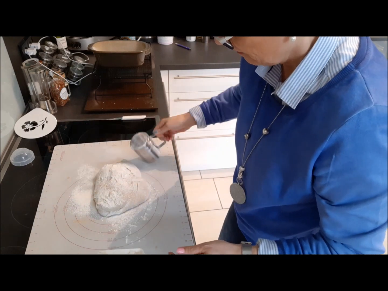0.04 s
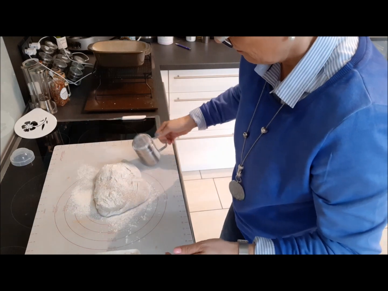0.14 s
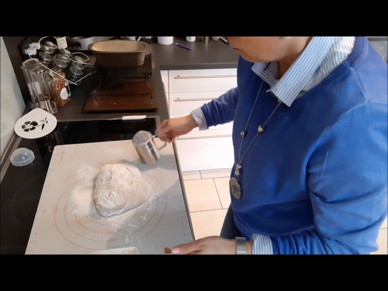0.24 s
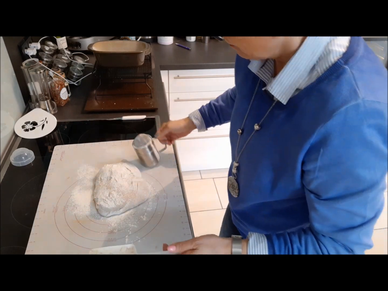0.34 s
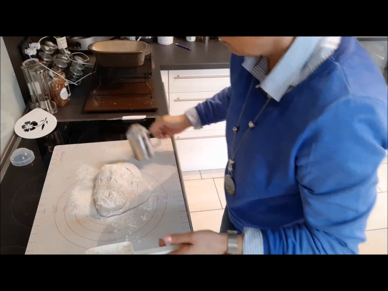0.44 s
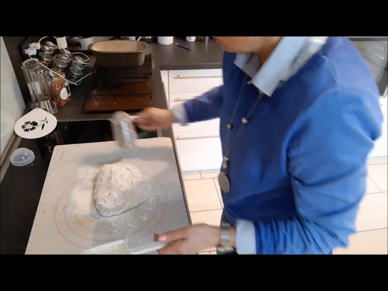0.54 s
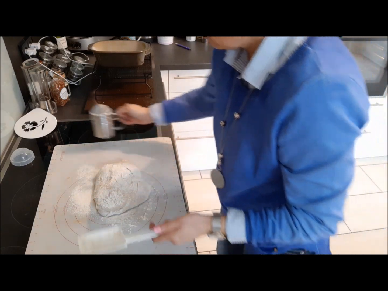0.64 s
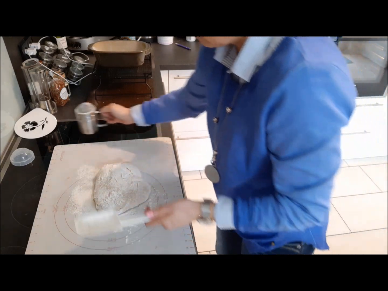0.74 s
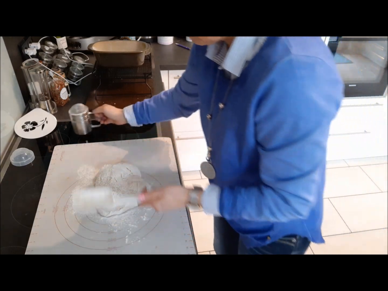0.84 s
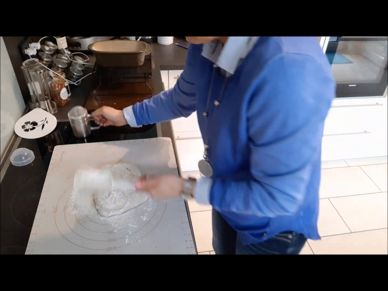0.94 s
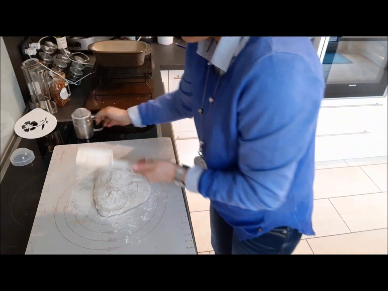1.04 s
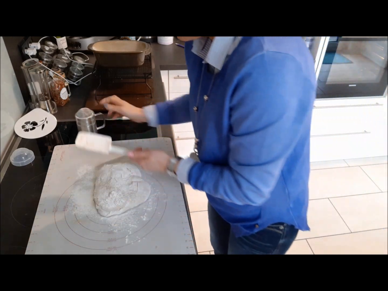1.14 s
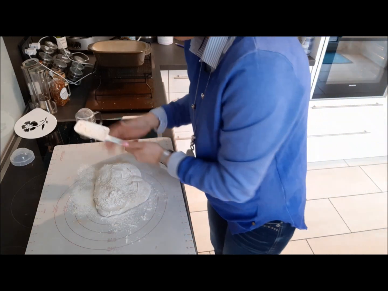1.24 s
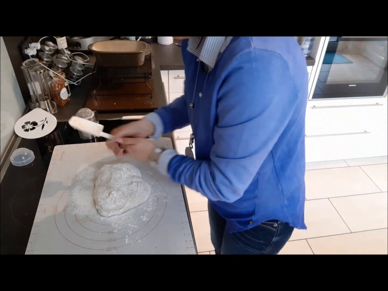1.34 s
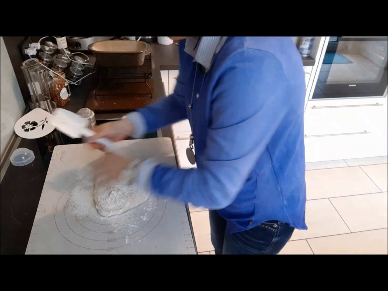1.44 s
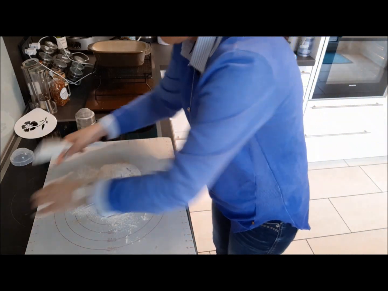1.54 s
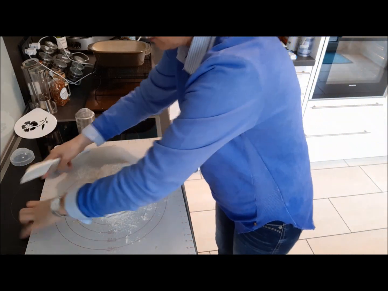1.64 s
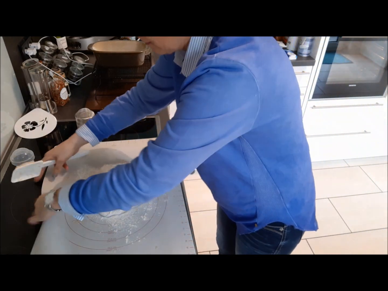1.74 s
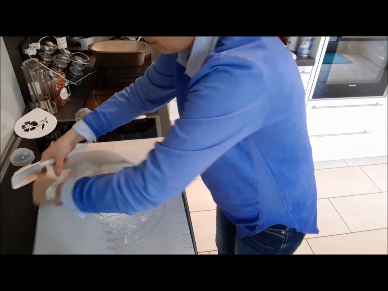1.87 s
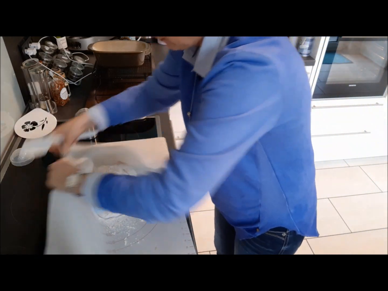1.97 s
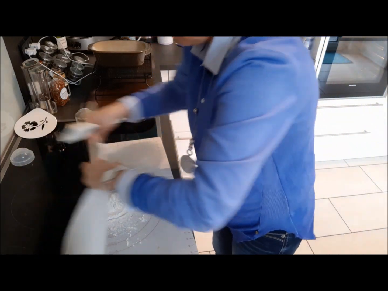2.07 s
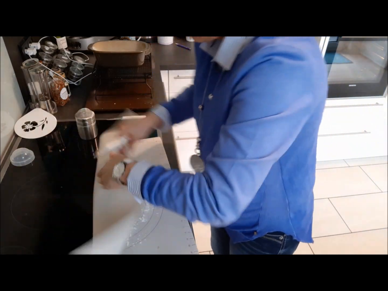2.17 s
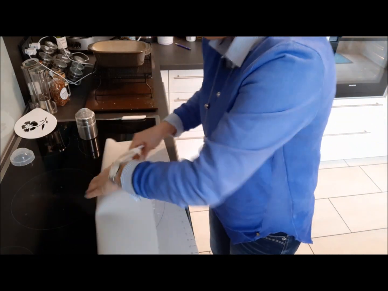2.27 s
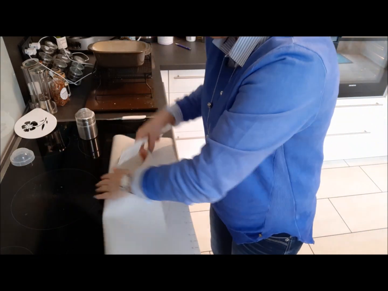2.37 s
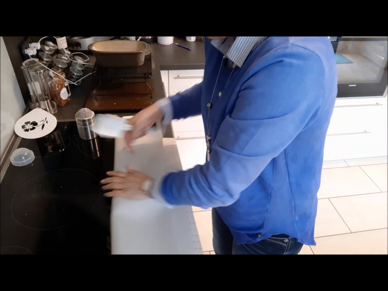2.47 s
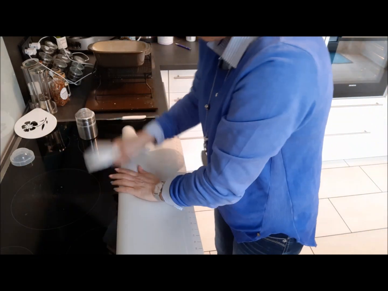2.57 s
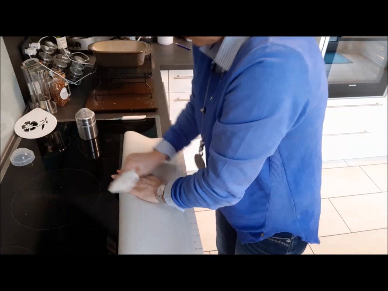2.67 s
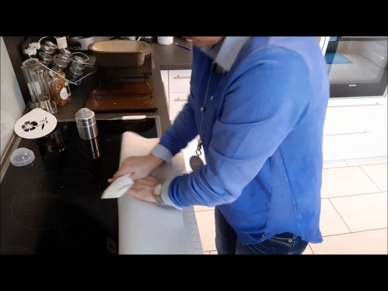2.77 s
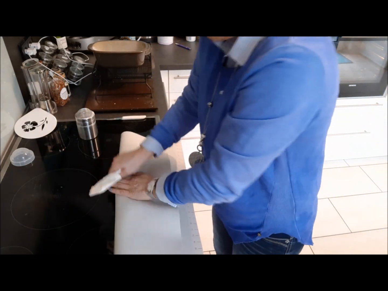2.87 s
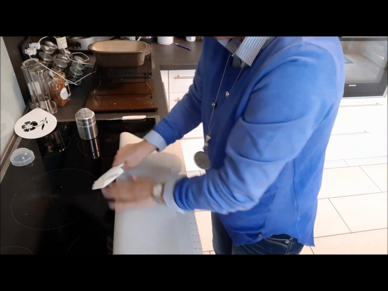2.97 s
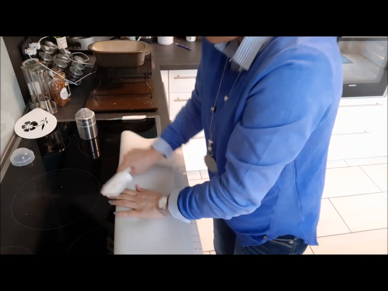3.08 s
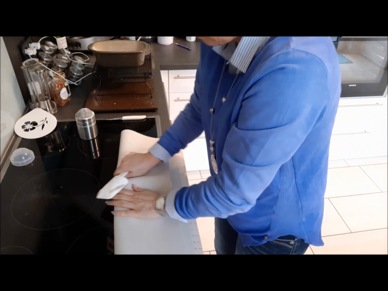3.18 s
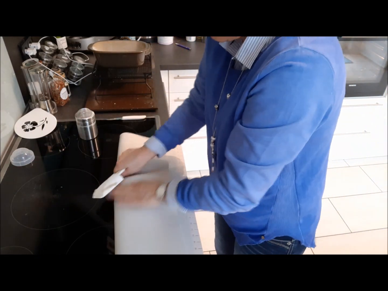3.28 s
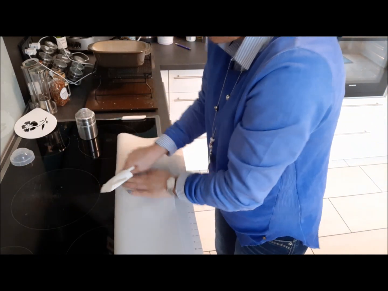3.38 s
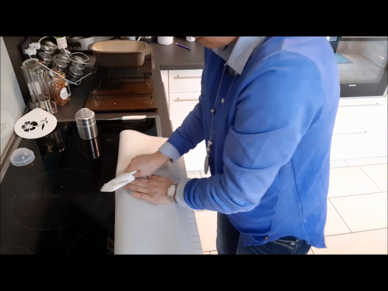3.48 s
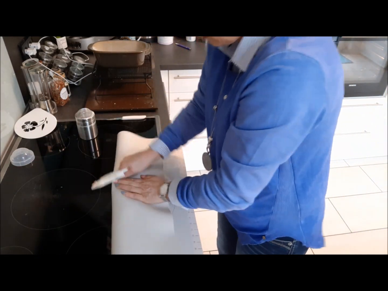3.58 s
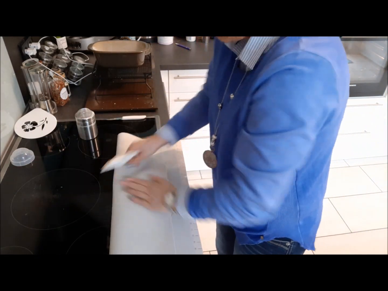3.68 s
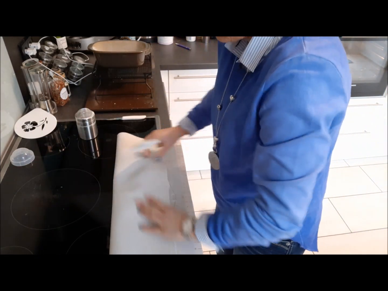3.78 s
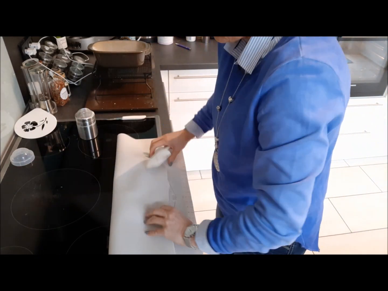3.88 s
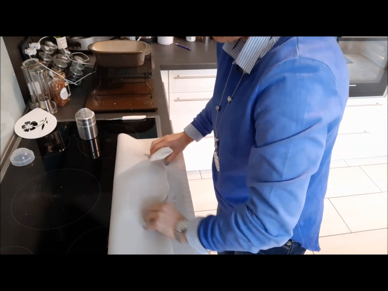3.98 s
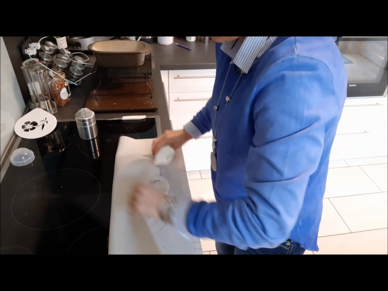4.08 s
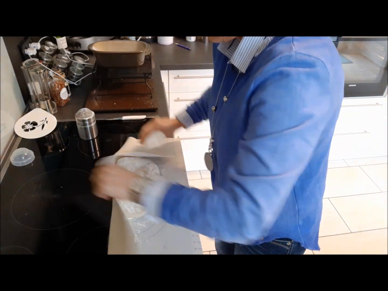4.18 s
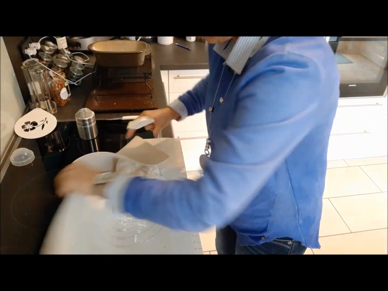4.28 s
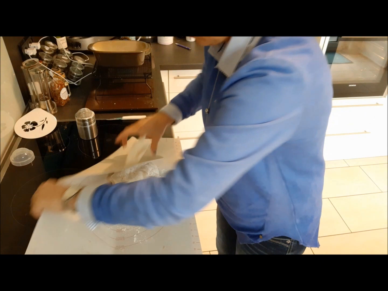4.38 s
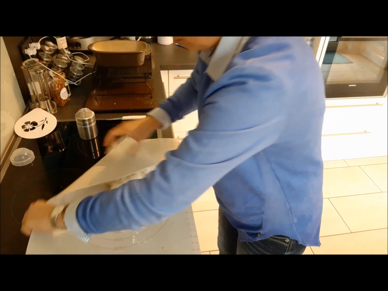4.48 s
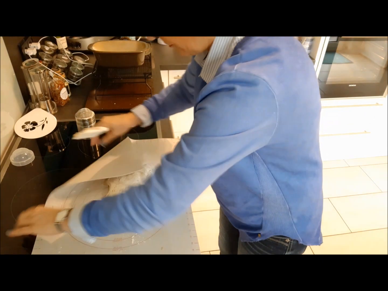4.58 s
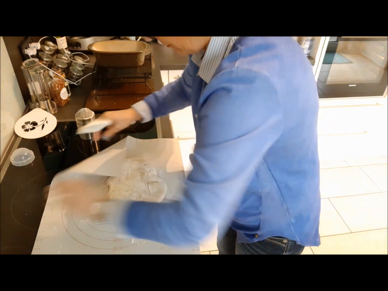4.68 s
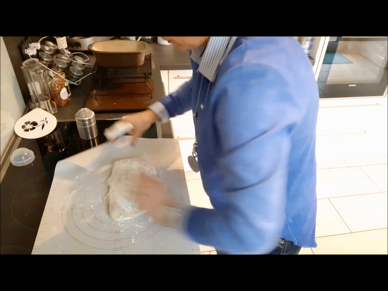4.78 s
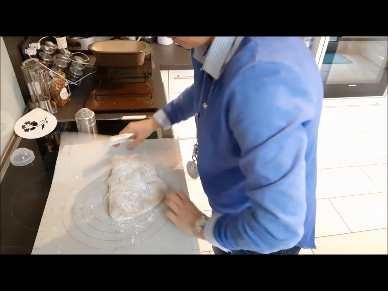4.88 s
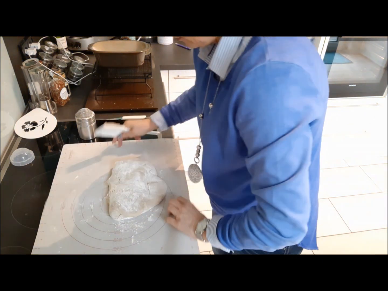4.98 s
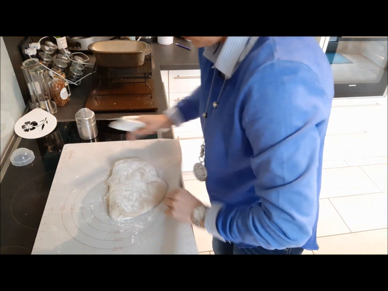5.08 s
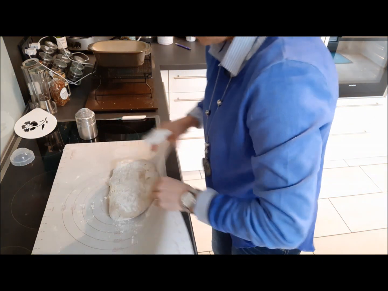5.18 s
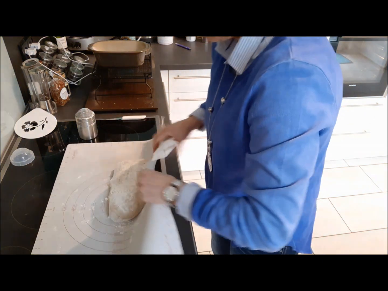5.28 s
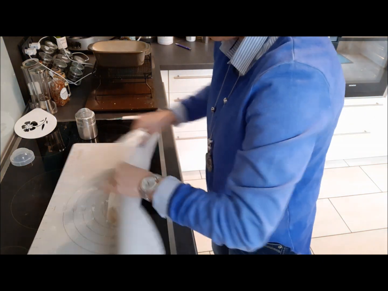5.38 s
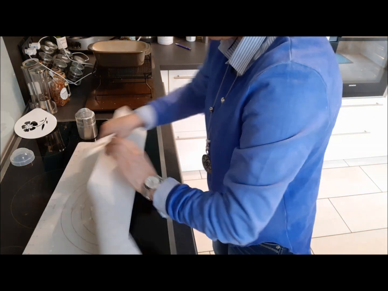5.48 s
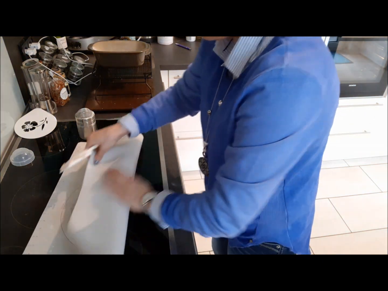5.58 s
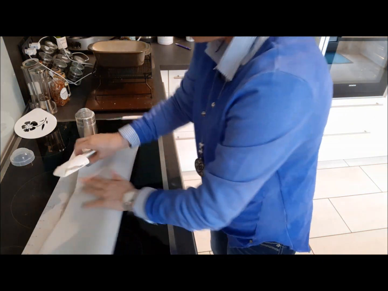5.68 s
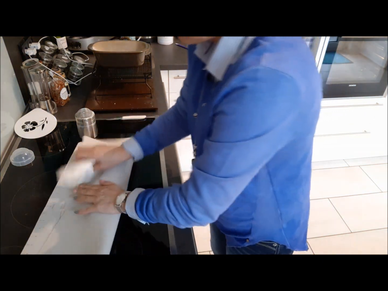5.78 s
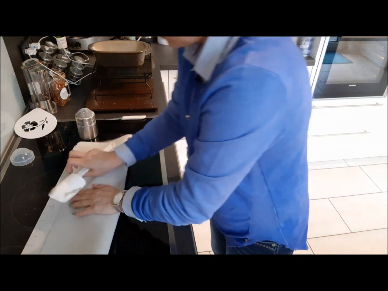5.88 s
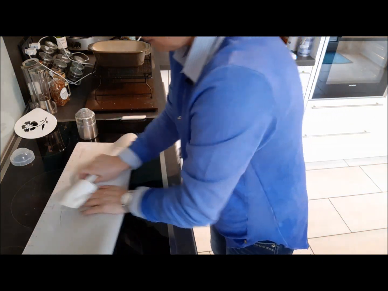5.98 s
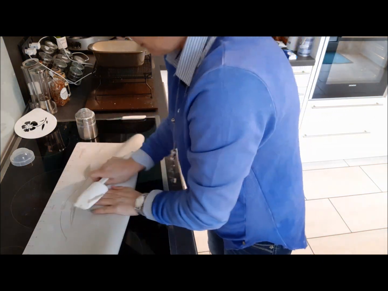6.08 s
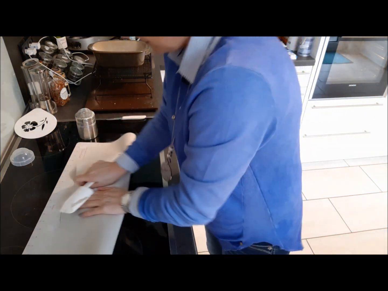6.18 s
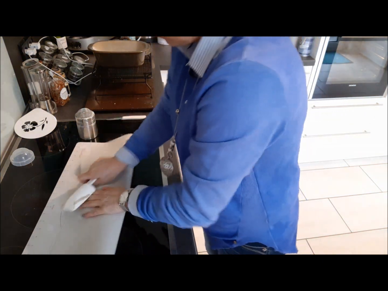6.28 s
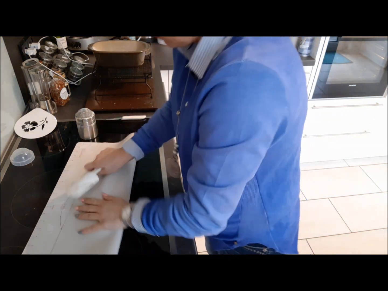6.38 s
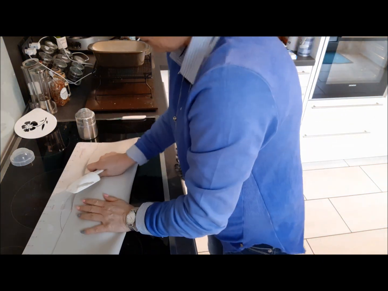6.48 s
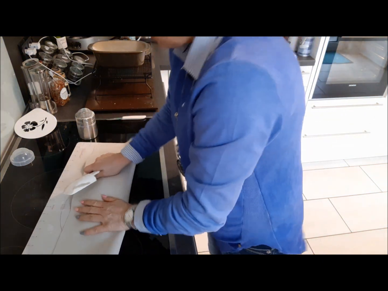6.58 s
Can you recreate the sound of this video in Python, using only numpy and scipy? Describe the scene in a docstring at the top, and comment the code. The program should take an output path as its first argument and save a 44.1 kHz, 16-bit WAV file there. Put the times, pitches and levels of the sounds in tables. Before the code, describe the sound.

A quiet, hard-surfaced kitchen with faint low room air, heard in stereo from nearby and leaning slightly right. At 0.0, 0.17 and 0.33 seconds a metal flour shaker is knocked, each a dull thump with a tinny rattle and short room echo. After a pause, the can lands on the counter at about 0.96 with a firm clunk, small bounces and a brief metallic ring. A sleeve-like swish starts near 1.35, and a hollow plastic scraper clack comes at 1.65. From about 1.7 to the end, hands drag and rub a soft mat in irregular strokes, with tiny sticky ticks. Crisp crinkling flaps stand out near 2.3, 2.5, 3.8, 4.5, 4.9 and 5.7; between 2.7 and 3.6 the rubbing is gentler. Hollow palm pats and muffled dough thuds accompany them, with low rolling around 5 to 5.4. Smoothing strokes continue past 6, with a soft pat at 6.4.

```python
"""Kitchen: flour shaker, scraper and baking mat

In a hard-walled kitchen a metal flour shaker is knocked three times over dough, then set down on the counter.
Hands rub a soft baking mat over the dough, and a plastic scraper clacks: shaped noise and filtered pulses.
The mat flaps and crinkles, air pops under the palm and the dough thuds: bursts, dying sines and dull pulses.
Every blow excites echoes, standing waves and a diffuse tail; quiet room air runs throughout."""
import sys
import numpy as np
from scipy import signal
from scipy.fft import rfft, irfft
from scipy.io import wavfile
from scipy.ndimage import uniform_filter1d

SR = 44100
rng = np.random.default_rng(int(sys.argv[2]) if len(sys.argv) > 2 else 0)


def dump(signal):
    """Clip the signal to [-1, 1] and save it as 16-bit WAV at the path in sys.argv[1]."""
    limited = np.clip(np.atleast_2d(signal).T, -1, 1)
    pcm = np.round(limited * 32767).astype(np.int16)
    wavfile.write(sys.argv[1], SR, pcm)


N = 292206

# colour of the mat's snaps and of its small slips: (frequency [Hz], relative level [dB])
SNAP_COLOUR = [(300, -30.5), (900, 5), (1600, 1.5), (2600, 0.5), (4200, 0), (7000, -6.5), (8600, -23),
               (15000, -29)]


def amp(db):
    """Turns decibels into gain."""
    return 10 ** (np.asarray(db) / 20)


def read(points, hz):
    """Reads a table on a logarithmic frequency axis."""
    f, value = np.transpose(points)
    return np.interp(np.log(hz + 1), np.log(f + 1), value)


def unit(x):
    """Scales to an energy of one."""
    return x / np.sqrt(np.sum(x ** 2, axis=-1, keepdims=True) + 1e-30)


def add(mix, s, sound):
    """Mixes a sound in at a time in seconds."""
    part = mix[max(round(s * SR), 0):][:len(sound)]
    part += sound[:len(part)]


def click(colour, size=4096):
    """The most compact causal pulse with a given spectrum: its phase follows from its log gain."""
    log_gain = np.log(amp(read(colour, abs(np.fft.fftfreq(size, 1 / SR)))))
    spectrum = np.exp(np.conj(signal.hilbert(log_gain)))
    return unit(np.fft.ifft(spectrum).real[:size // 2])


def tint(x, colour):
    """Filters a long sound by a table of levels."""
    n = x.shape[-1]
    return irfft(rfft(x) * amp(read(colour, np.fft.rfftfreq(n, 1 / SR))), n)


def diffuse(pair, spacing_m=0.15):
    """Sound from all sides at two close points: alike in the bass, unrelated in the treble."""
    n = pair.shape[1]
    a, b = rfft(pair)
    same = np.sinc(2 * spacing_m * np.fft.rfftfreq(n, 1 / SR) / 343)  # speed of sound in m/s
    mid = a * np.sqrt((1 + same) / 2)
    side = b * np.sqrt((1 - same) / 2)
    return irfft(np.array([mid + side, mid - side]), n)


def friction(colour, patchy_db, flutter_db, size=512):
    """Wide noise at an rms of one; its level flutters, and patches of time favour some pitches."""
    hz, _, z = signal.stft(diffuse(rng.standard_normal((2, N))), SR, nperseg=size)
    patches = uniform_filter1d(rng.standard_normal(z.shape[1:]), size=6, axis=0)
    patches = uniform_filter1d(patches, size=8, axis=1)
    flutter = uniform_filter1d(rng.standard_normal(z.shape[2]), size=5)
    z = z * amp(patchy_db * patches / patches.std() + flutter_db * flutter / flutter.std())
    noise = signal.istft(z, nperseg=size)[1][:, :N]
    return unit(tint(noise, colour)) * np.sqrt(N)


def chatter(rise_s, size=2048, count=8):
    """The many tiny contacts of one touch: noise that swells for about rise_s and fades, nearly white."""
    u = (np.arange(size) + 1) / (SR * max(rise_s, 1e-4))
    burst = rng.standard_normal(size) * u * np.exp(-u)
    for _ in range(count):
        white = irfft(np.exp(1j * np.angle(rfft(burst))), size)
        burst = white / (1 + (u / 7) ** 4)  # whitening smears the burst, so its end is faded again
    return unit(burst)


def blow(colour, rise_s, split_hz=1200, order=5):
    """A hard contact: a clean push in the bass, a burst of fine contacts in the treble."""
    low = signal.butter(order, split_hz, "low", fs=SR, output="sos")
    high = signal.butter(order, split_hz, "high", fs=SR, output="sos")
    pulse = click(colour)
    burst = signal.fftconvolve(pulse, chatter(rise_s))[:len(pulse)]
    return unit(signal.sosfilt(low, pulse) + signal.sosfilt(high, burst))


def ringing(modes, t):
    """A sum of dying tones, all struck at once; t60 is the time to fall by 60 dB."""
    out = 0
    for hz, db, t60 in modes:
        decay = np.exp(-np.log(1000) * t / t60)
        out = out + amp(db) * unit(np.cos(2 * np.pi * hz * t) * decay)
    return out


def swells(rows, t):
    """Smooth strokes that speed up and slow down: level curves symmetric about their peaks."""
    return sum(amp(db) / (1 + ((t - at) / half) ** 2 / 2) ** 2 for at, db, half in rows)


def room_air(level_db=-64):
    """The quiet kitchen: coloured wide noise with a slight flutter."""
    # colour of the still air: (frequency [Hz], relative level [dB])
    air_colour = [(20, -23.5), (45, -14), (70, -9), (160, -14), (200, 0), (250, -11.5), (630, -13),
                  (1000, -22.5), (1500, -28.5), (3500, -31), (7400, -28), (8800, -36.5), (15000, -31)]
    return amp(level_db) * friction(air_colour, patchy_db=1.3, flutter_db=1.0)


def shaker(ring_db=-38):
    """Each knock is a thump with a rattle of tin; then the can lands on the counter and rings."""
    # knocks of the shaker: (time [s], thump level [dB], tin rattle level [dB])
    knocks = [(0.0075, -29.5, -26.5), (0.1747, -28.5, -27.5), (0.3253, -26, -26)]
    # contacts in one knock, as can and flour land in turn, added to its levels:
    # (delay [s], thump level [dB], tin rattle level [dB])
    knock_contacts = [(0, -2, -22.5), (.0044, -15, -8), (.008, -4, -27), (0.0097, 5, -33)]
    # colours of thump, rattle and landing: (frequency [Hz], relative level [dB])
    thump_colour = [(25, -27), (55, -9), (110, 0.5), (220, 8), (350, 6.5), (490, 1.5), (640, -5),
                    (880, -6.5), (1200, -24.5), (2200, -56.5), (8000, -74)]
    rattle_colour = [(200, -5), (600, -16.5), (860, 0.5), (1150, 3), (2200, 0.5), (3600, -0.5),
                     (4800, -8.5), (7200, -13.5), (8600, -29.5), (15000, -47)]
    landing_colour = [(25, -73), (70, -27), (170, -3), (250, -4), (340, -4.5), (530, -0.5), (750, -3.5),
                      (1100, -3), (1500, -9), (2000, -7.5), (3200, -11), (4500, -21), (6600, -26.5),
                      (8600, -42.5), (15000, -54)]
    # the can lands with small follow-up contacts; the last pulse is the room answering 35 ms later:
    # (time [s], level [dB])
    landing_pulses = [(0.9639, -17.5), (0.9699, -31.5), (0.988, -32.5), (0.9985, -22)]
    # tones of the steel can, all scaled by ring_db: (frequency [Hz], relative level [dB], t60 [s])
    can_modes = [(1110, -7.5, .2), (1085, 3, 0.31), (1310, -6, 0.45), (1560, -13.5, 0.37),
                 (1886, -2.5, 0.11), (2160, -10, 0.2), (2470, -9, .16), (3040, -17, 0.13)]
    out, thump = np.zeros(N), click(thump_colour)
    for s, db, tin_db in knocks:
        for delay, thump_db, rattle_db in knock_contacts:
            rattle = blow(rattle_colour, rise_s=0.0011, split_hz=370)
            add(out, s + delay, amp(db + thump_db) * thump + amp(tin_db + rattle_db) * rattle)
    for s, db in landing_pulses:
        add(out, s, amp(db) * blow(landing_colour, rise_s=0.0015))
    add(out, landing_pulses[0][0], amp(ring_db) * ringing(can_modes, np.arange(SR) / SR))
    return out


def strokes(attack_s=0.037, release_db_per_s=86, sleeves_from_s=1.3, sleeves_db=-69):
    """Strength of drag and rustle: each stroke gathers speed, holds and dies away; sleeves whisper on."""
    # strokes of the hands over the mat:
    # (start [s], length [s], dull drag level [dB], dry rustle level [dB])
    stroke_rows = [(1.33, 0.46, -67.5, -61.5), (1.715, 0.066, -50, -55), (1.949, 0.19, -60, -56),
                   (2.312, .1, -46, -51), (2.463, 0.15, -49.5, -53), (2.683, 0.36, -60, -61),
                   (3.096, 0.12, -62, -62), (3.245, 0.28, -59, -59.5), (3.588, 0.12, -58, -61),
                   (3.82, 0.12, -56, -56.5), (3.958, 0.023, -68, -50), (4.067, 0.065, -56, -55),
                   (4.36, 0.072, -83, -55.5), (4.493, 0.078, -49, -55.5), (4.89, .1, -55.5, -56.5),
                   (5.065, 0.095, -60, -70), (5.306, 0.16, -68, -60), (5.599, 0.17, -49, -51.5),
                   (5.875, 0.2, -52, -55.5), (6.117, 0.082, -50.5, -56.5), (6.317, 0.16, -56, -62.5)]
    t, power = np.arange(N) / SR, np.zeros((2, N))
    for start, length, drag_db, rustle_db in stroke_rows:
        age = np.maximum(t - start, 0)
        release = amp(-release_db_per_s * np.maximum(age - length, 0))
        envelope = np.minimum(age / attack_s, 1) * release
        power += (amp([[drag_db], [rustle_db]]) * envelope) ** 2
    # the sleeves add to the rustle alone
    power[1] += amp(sleeves_db) ** 2 * np.clip((t - sleeves_from_s) / attack_s, 0, 1)
    return np.sqrt(power)


def rubbing(drag, rustle, drag_db=-2, rustle_db=-3.0):
    """Hands drag the mat over the worktop; fast slides add a bright swish, rolling dough a low rumble."""
    # colours of the four noises: (frequency [Hz], relative level [dB])
    drag_colour = [(30, -48), (90, -5.5), (200, -7), (380, 3), (560, 4), (850, 1), (1400, -3.5),
                   (3000, -35)]
    rustle_colour = [(400, -41), (1300, 0.5), (2600, 1), (4500, -2), (7200, -1), (8600, -17.5),
                     (15000, -20)]
    swish_colour = [(500, -22), (2000, -3.5), (3700, 7.5), (5200, 3.5), (7200, 5.5), (8800, -7),
                    (15000, -5)]
    roll_colour = [(25, -56), (90, -14), (170, -3), (260, -5), (400, -8), (700, -12), (2000, -53)]
    # quick slides of sleeve and palm: (time at the fastest [s], level [dB], half length [s])
    slides = [(1.40, -55.5, 0.072), (3.82, -55, 0.083), (5.42, -51.5, 0.036), (6.379, -55.5, 0.054)]
    # the dough slumps and rolls inside the mat: (time at the fastest [s], level [dB], half length [s])
    dough_rolls = [(4.13, -61.5, 0.035), (5.01, -59, 0.084), (5.31, -66, 0.046), (5.42, -58.5, 0.086),
                   (5.96, -57.5, 0.038)]
    t = np.arange(N) / SR
    out = amp(drag_db) * drag * friction(drag_colour, patchy_db=2.4, flutter_db=1.9)
    out += amp(rustle_db) * rustle * friction(rustle_colour, patchy_db=2.5, flutter_db=1.0)
    swish = swells(slides, t) * friction(swish_colour, patchy_db=0.0, flutter_db=1.5)
    roll = swells(dough_rolls, t) * friction(roll_colour, patchy_db=1, flutter_db=1)
    return out + swish + roll


def ticks(rustle, per_s=120, level_db=-9, spread_db=1):
    """The mat sticks and slips by chance: tiny snaps as strong as the stroke that causes them."""
    sizes = amp(spread_db * np.minimum(rng.exponential(1, N), 3))
    slips = (rng.random(N) < per_s / SR) * sizes
    train = rustle * unit(slips) * np.sqrt(N)
    return amp(level_db) * signal.oaconvolve(train, click(SNAP_COLOUR))[:N]


def scraper(click_db=-13):
    """A hollow plastic clack, a hit and its close echoes, with a hard edge click on each."""
    # the hit and its close echoes: (time [s], level [dB])
    clacks = [(1.6445, -30), (1.652, -28.5), (1.6587, -36)]
    # colour of the clack: (frequency [Hz], relative level [dB])
    clack_colour = [(25, -58), (80, -13), (140, -14.5), (190, 3), (260, -10.5), (400, 1.5), (570, -1),
                    (800, -11.5), (1350, -13), (2000, -22), (4200, -19), (5400, -19.5), (6600, -27),
                    (8600, -40), (15000, -43)]
    # tones of the edge, all scaled with click_db: (frequency [Hz], relative level [dB], t60 [s])
    edge_modes = [(5700, -2, 0.0066), (6350, 0, .015), (6950, -4, 0.008)]
    out = np.zeros(N)
    for s, db in clacks:
        add(out, s, amp(db) * blow(clack_colour, rise_s=0.00027))
        add(out, s, amp(db + click_db) * ringing(edge_modes, np.arange(1024) / SR))
    return out


def mat(snap_db=-8, fold_db=7.0, fold_octaves=0.72):
    """The mat flaps: each fold crinkles as a burst of contacts with a broad peak at its own pitch."""
    # flaps, all shifted by snap_db:
    # (time [s], level [dB], pitch of the fold [Hz], rise of the crinkle [s])
    flaps = [(2.03, -45, 2910, 0.0033), (2.125, -48.5, 2440, 0.0027), (2.2985, -35, 1970, .0027),
             (2.533, -37.5, 1790, 0.003), (2.9738, -53, 1270, .001), (3.4223, -50.5, 1470, 0.0028),
             (3.7989, -34, 1750, 0.0043), (3.817, -39, 1690, 0.0033), (3.982, -41.5, 3650, 0.0067),
             (4.073, -44.5, 1090, 0.0082), (4.147, -44, 1580, 0.0095), (4.3775, -46.5, 2720, 0.00096),
             (4.455, -42.5, 3230, 0.0057), (4.4789, -34.5, 2420, .0009), (4.5755, -36, 1600, 0.00087),
             (4.9069, -35.5, 3870, 0.0038), (4.954, -40, 1960, 0.0046), (5.0856, -43.5, 2230, 0.00091),
             (5.1902, -46.5, 1465, .0005), (5.614, -40, 4100, 0.0032), (5.717, -36, 4330, 0.0026),
             (5.866, -43.5, 1380, 0.0076), (6.2222, -56, 1800, 0.0016), (6.4113, -46, 990, 0.0013)]
    out = np.zeros(N)
    grid = np.geomspace(100, 16000, num=60)
    for s, db, fold_hz, rise_s in flaps:
        fold = fold_db * np.exp(-(np.log2(grid / fold_hz) / fold_octaves) ** 2)
        snap = click(np.c_[grid, read(SNAP_COLOUR, grid) + fold])
        add(out, s, amp(db + snap_db) * unit(signal.fftconvolve(chatter(rise_s), snap)))
    return out


def pats(pat_db=-4, thud_db=-5, pocket_width_hz=170, size=2048):
    """Pockets of air pop under the palm as short dying sines; the dough thuds on the worktop."""
    # pats of the palm, all shifted by pat_db: (time [s], level [dB], pitch of the trapped air [Hz])
    palm_pats = [(2.130, -48.5, 432), (2.3016, -38.5, 487), (2.536, -42.5, 527), (2.953, -55, 506),
                 (2.977, -51, 514), (3.045, -53.5, 540), (3.803, -48.5, 480), (3.821, -50, 546),
                 (3.878, -49, 540), (3.895, -45, 575), (4.074, -50, 800), (4.081, -46, 675),
                 (4.498, -46.5, 450), (4.576, -51.5, 477), (4.925, -49, 735), (5.087, -44.5, 536),
                 (5.735, -46, 524), (5.763, -46.5, 520), (5.862, -44, 696), (5.885, -55, 546),
                 (6.225, -54.5, 764), (6.412, -43.5, 773)]
    # the dough drops or is pressed, all shifted by thud_db: (time [s], level [dB])
    dough_thuds = [(2.130, -61), (2.303, -55), (3.4242, -56.5), (3.803, -48.5), (4.498, -55), (4.575, -55),
                   (4.925, -46.5), (4.958, -51), (5.728, -51), (5.883, -48), (6.414, -55.5)]
    # colour of the thud: (frequency [Hz], relative level [dB])
    thud_colour = [(25, -43), (70, -10), (170, 7), (280, 10), (450, -7.5), (1500, -61)]
    out, t, thud = np.zeros(N), np.arange(size) / SR, click(thud_colour)
    envelope = np.exp(-np.pi * pocket_width_hz * t) * (1 - np.exp(-t / 0.00082))
    for s, db, hz in palm_pats:
        add(out, s, amp(db + pat_db) * unit(envelope * np.sin(2 * np.pi * hz * t)))
    for s, db in dough_thuds:
        add(out, s, amp(db + thud_db) * thud)
    return out


def reverberation(t, build_s=0.0022, near_db=-4, near_s=0.031, order=9):
    """Dense reflections that build up, then die at each band's own speed."""
    # decay of the room: (frequency [Hz], t60 [s])
    decay_times = [(80, 0.51), (250, 0.47), (600, 0.62), (1400, 0.61), (3500, 0.56), (6500, 0.43),
                   (12000, 0.42)]
    z = rfft(rng.standard_normal((2, len(t))))
    z /= np.sqrt(uniform_filter1d(abs(z) ** 2, 60, axis=1))
    hz, centres = np.fft.rfftfreq(len(t), 1 / SR), np.geomspace(80, 14000, order)
    tail = 0
    for centre, share in zip(centres, np.eye(order)):
        band = irfft(z * read(np.c_[centres, share], hz), len(t))
        tail = tail + band * np.exp(-np.log(1000) * t / read(decay_times, centre))
    near = 1 + amp(near_db) * np.exp(-(t / near_s) ** 2)  # cupboards and worktop answer first
    z = rfft(tail * near * (1 - np.exp(-t / build_s)))
    z /= np.sqrt(uniform_filter1d(abs(z) ** 2, size=90, axis=1))  # the walls favour no band
    onset = np.minimum(t / 0.0009, 1)
    return unit(diffuse(irfft(z, len(t)) * onset))


def kitchen(x, direct_db=-12.5, tail_db=-4.0, modes_db=-22.0, drift_hz=2.1, count=3):
    """Direct sound, near echoes, standing waves and a diffuse tail that changes as the cook moves."""
    # echoes of nearby surfaces: (delay [s], level against the direct sound [dB])
    near_echoes = [(.0062, -2.5), (.0105, -10.5), (.0235, -7.5), (.0345, -17)]
    # standing waves of kitchen and worktop, all scaled by modes_db:
    # (frequency [Hz], relative level [dB], t60 [s])
    room_modes = [(61.5, -10, 0.67), (93.5, -14, 0.36), (114.6, -10.5, 0.36), (138, -24, 0.73),
                  (163.4, -10, 0.46), (193.7, -18, 0.64), (220.6, -14, 0.35), (244, -9.5, 0.51),
                  (302.6, -20, 0.66), (315.4, -17, 0.8), (318.7, -10, 0.35), (345, -5.5, 0.47),
                  (372, -12.5, 0.61), (389, -33, 0.65), (425, -15.5, 0.35), (446, -10, 0.32),
                  (461.2, -18, 0.47), (505.6, -17, 0.39), (512.6, -10, 0.57), (543, -28, 0.1),
                  (583, -10.5, 0.18), (616, -12, 0.21), (652, -18, 0.95), (736, -20.5, .55),
                  (775, -28, 0.66), (802, -17.5, 0.12), (930, -15.5, 0.67)]
    # colour of the diffuse tail: (frequency [Hz], relative level [dB])
    tail_colour = [(60, -0.5), (450, -2), (700, 2.5), (1000, -0.5), (16000, -3.5)]
    t = np.arange(SR) / SR
    early = np.zeros((2, SR))
    early[:, 0] = 1
    for k, (delay, db) in enumerate(near_echoes):
        skew = (-1) ** k * .00008  # seconds; echoes come from alternate sides
        add(early[0], delay + skew, amp([db]))
        add(early[1], delay - skew, amp([db]))
    response = amp(direct_db) * early + amp(modes_db) * ringing(room_modes, t)
    out = signal.fftconvolve(x[None], response, axes=1)
    for k in range(count):
        # the tails take turns, and their summed power stays even
        turn = np.cos(np.pi * (drift_hz * np.arange(N) / SR + k / count)) ** 2
        share = turn * np.sqrt(8 / (3 * count))
        tail = tint(reverberation(t), tail_colour) * (t < .8)
        out += amp(tail_db) * signal.fftconvolve((x * share)[None], tail, axes=1)
    return out[:, :N]


def scene():
    """Blows and ticks sound in the room, over dry rubbing and still air; all leans slightly to the right."""
    # stereo balance: (frequency [Hz], left minus right [dB])
    balance = [(60, -4.5), (250, -1), (500, -4.5), (2000, -5.5), (4500, -3.9), (12000, -2)]
    drag, rustle = strokes()
    blows = shaker() + scraper() + mat() + pats()
    blows = blows * np.sqrt(SR / 20)  # levels count over a twentieth of a second
    # the blows push with reversed polarity
    left, right = kitchen(ticks(rustle) - blows) + rubbing(drag, rustle) + room_air()
    lean = amp(read(balance, np.fft.rfftfreq(N, 1 / SR)) / 2)
    return irfft(np.array([rfft(left) * lean, rfft(right) / lean]), N)


def record(dry, edge_hz=15650):
    """A steep low-pass filter closes off the highest treble."""
    low_pass = signal.firwin(511, edge_hz, window=("kaiser", 9), fs=SR)
    return signal.oaconvolve(dry, low_pass[None], "same")


dry = scene()
out = record(dry)
dump(out)
```